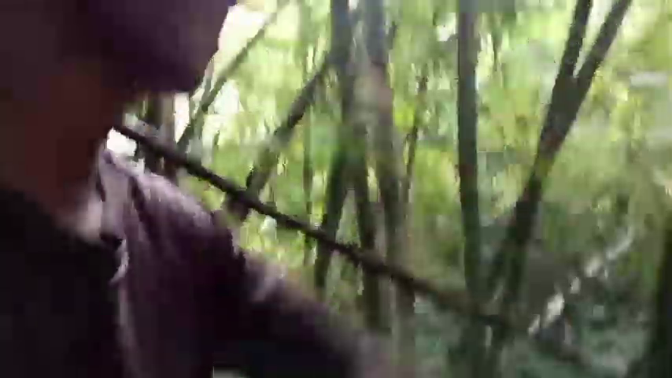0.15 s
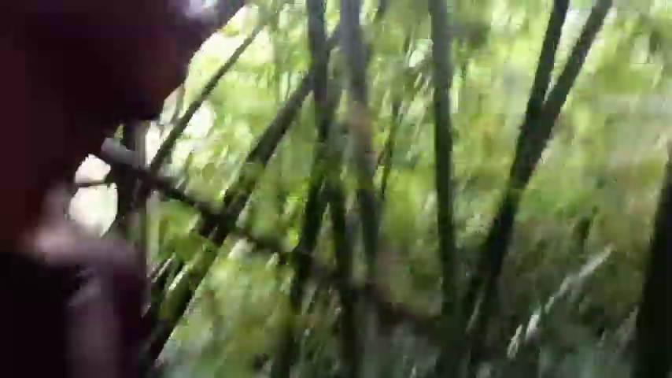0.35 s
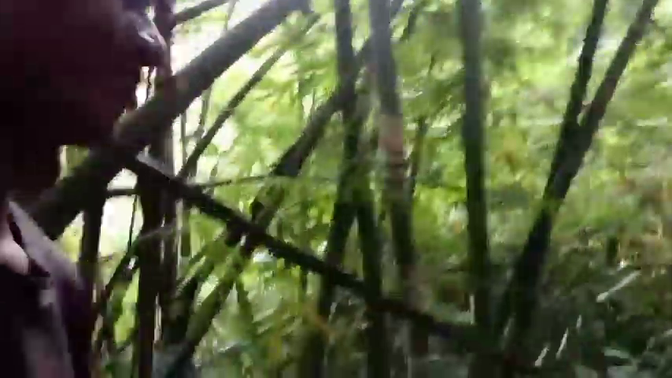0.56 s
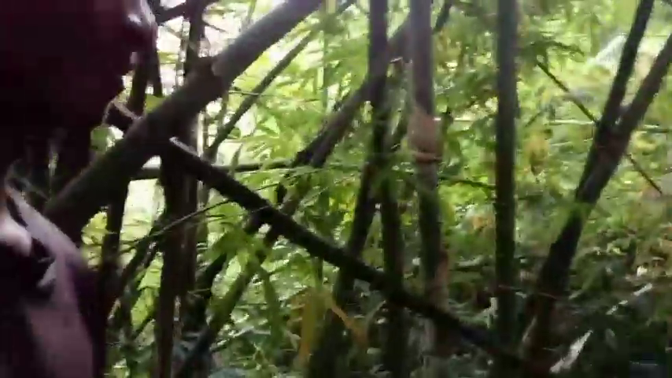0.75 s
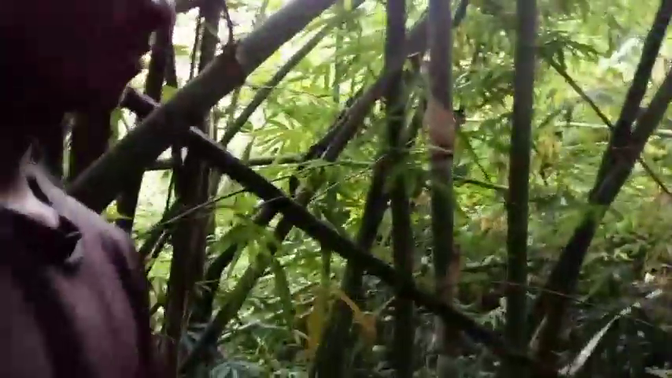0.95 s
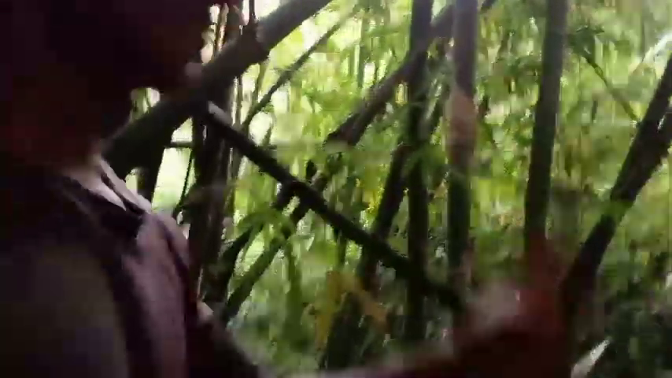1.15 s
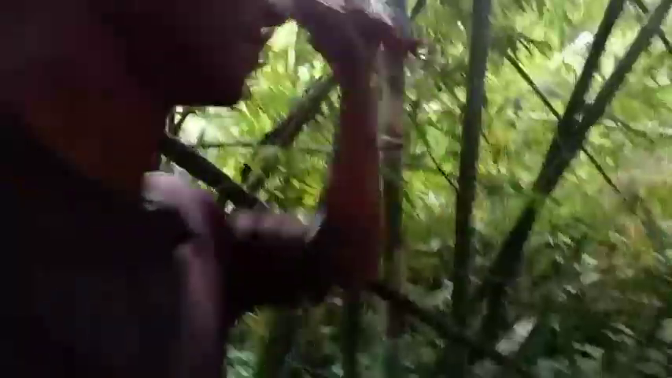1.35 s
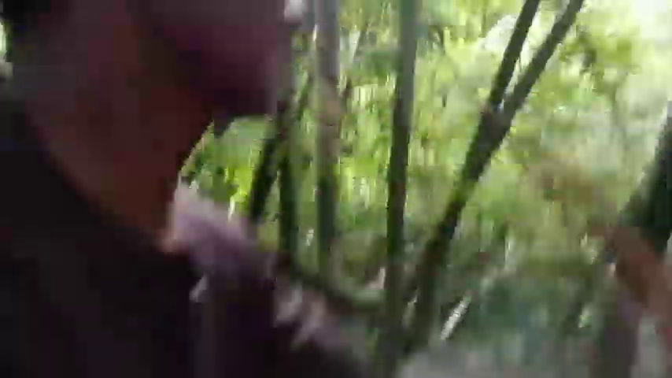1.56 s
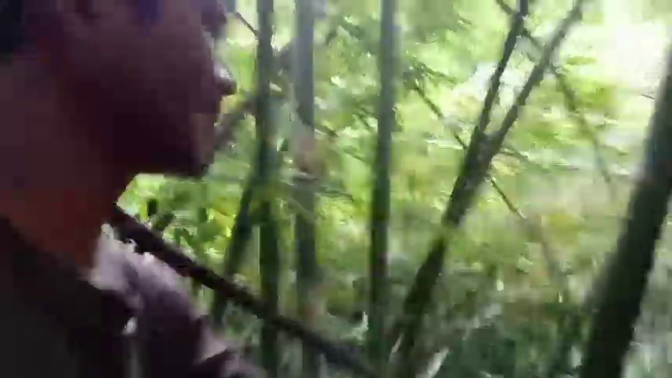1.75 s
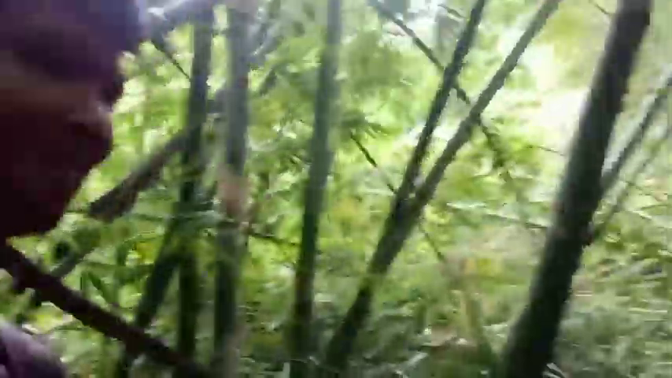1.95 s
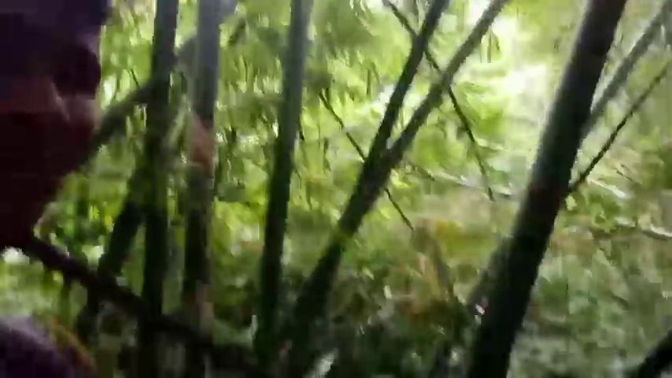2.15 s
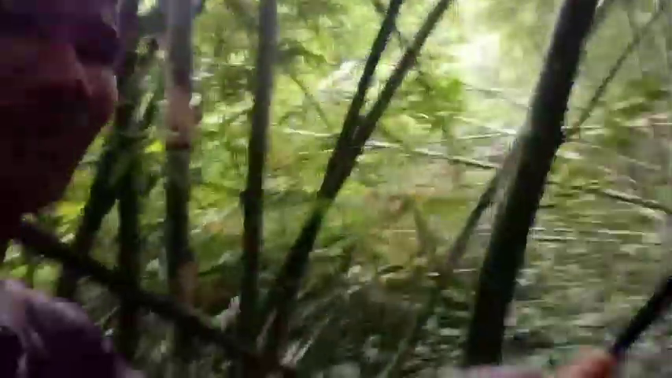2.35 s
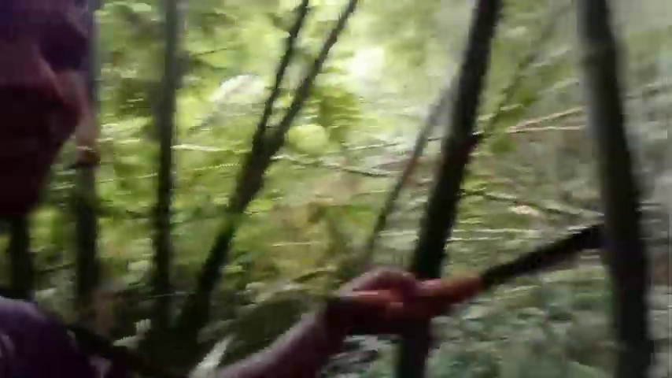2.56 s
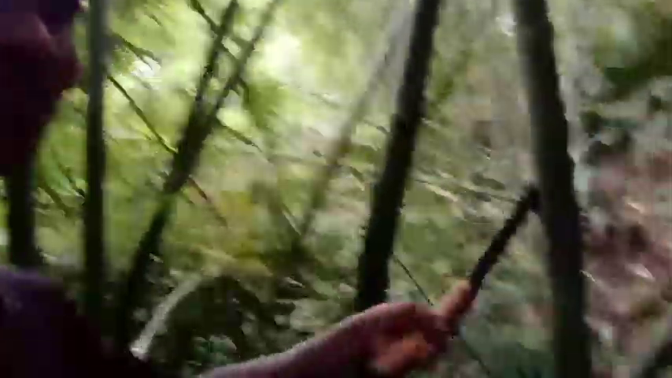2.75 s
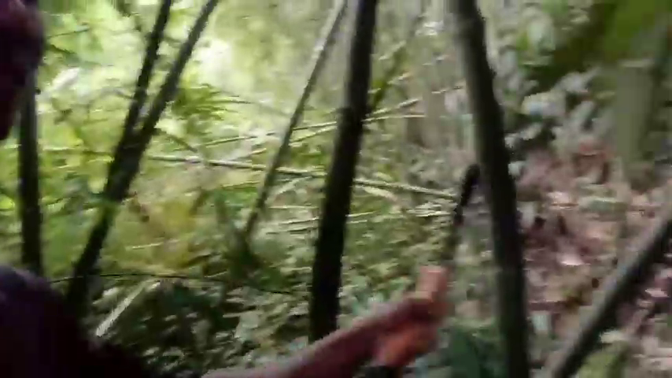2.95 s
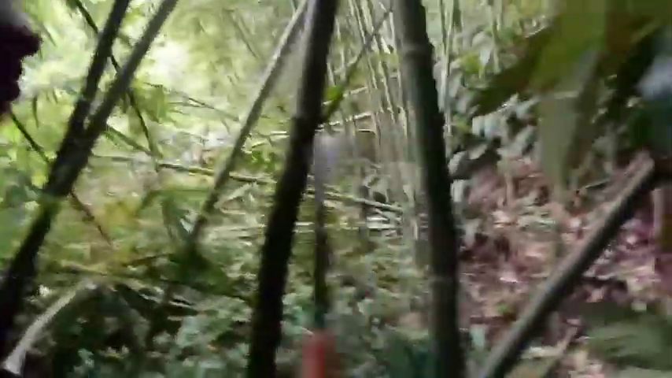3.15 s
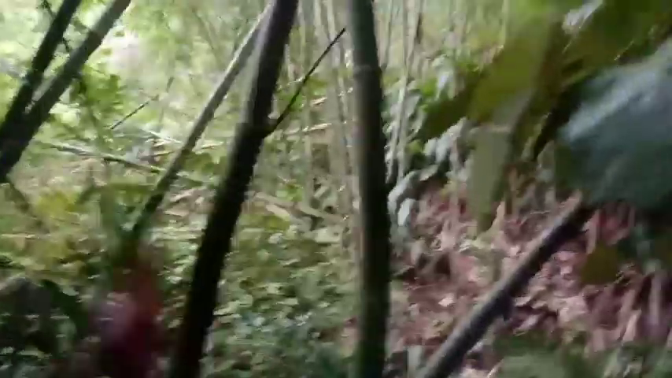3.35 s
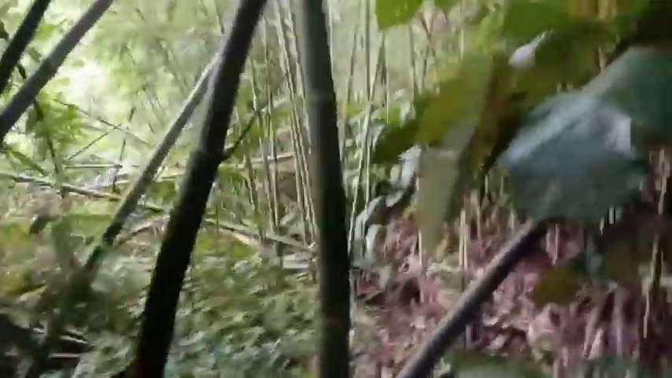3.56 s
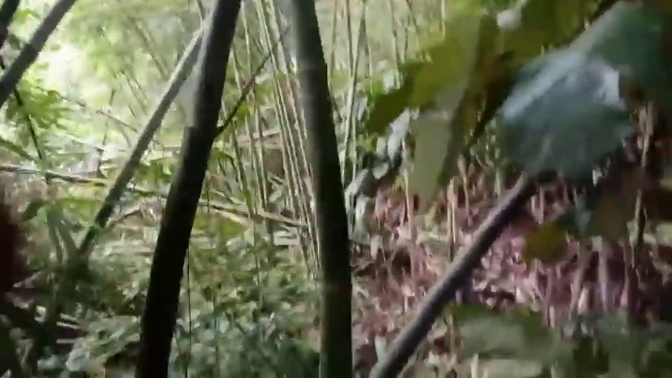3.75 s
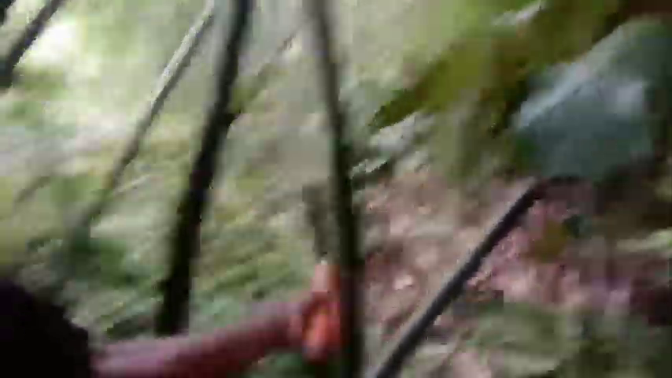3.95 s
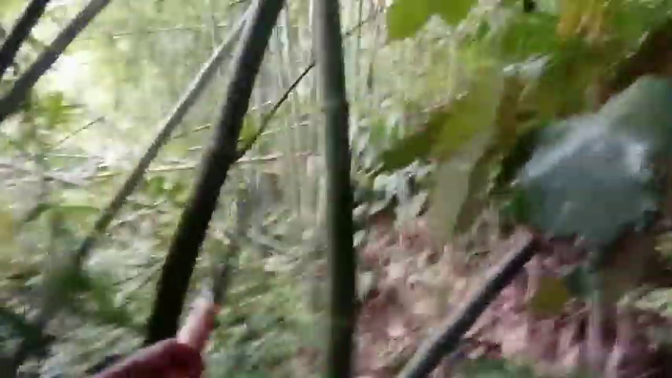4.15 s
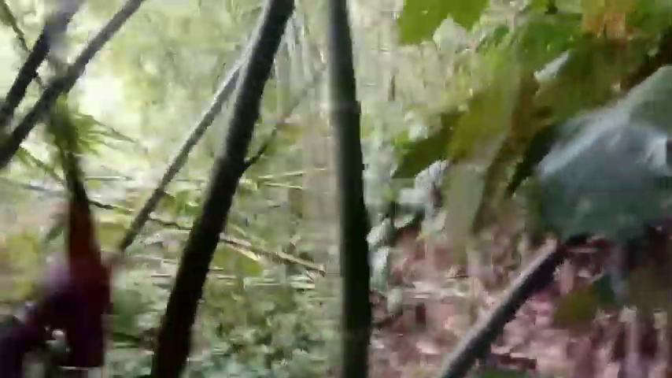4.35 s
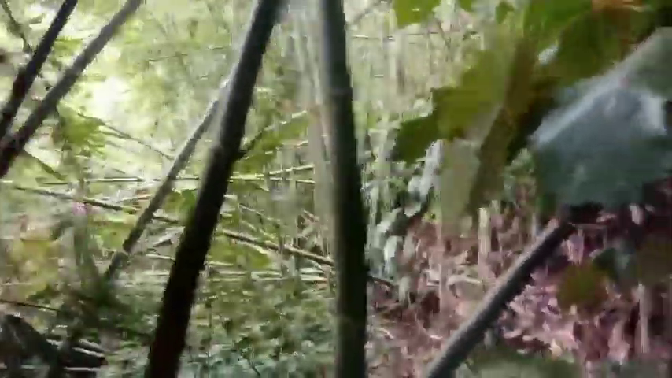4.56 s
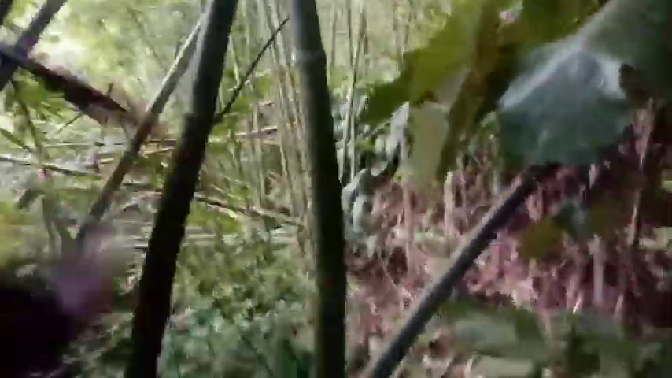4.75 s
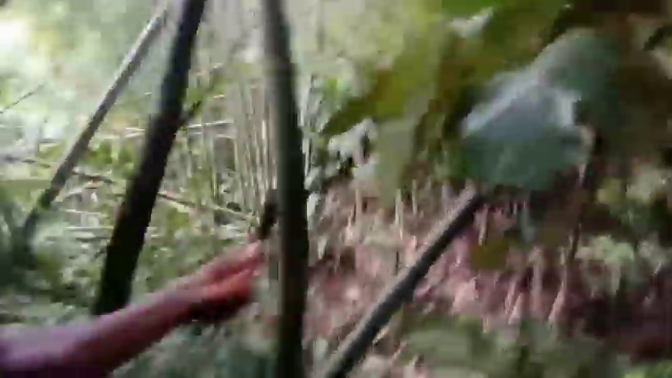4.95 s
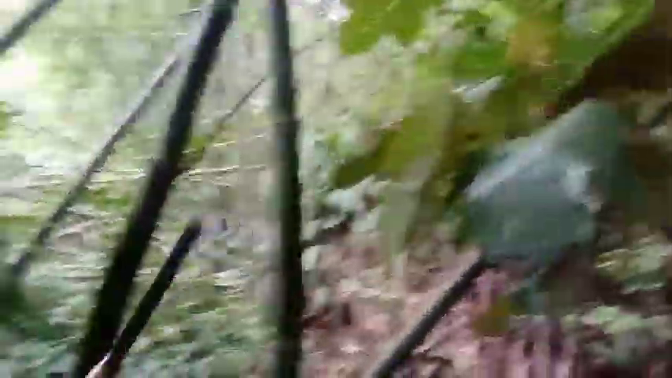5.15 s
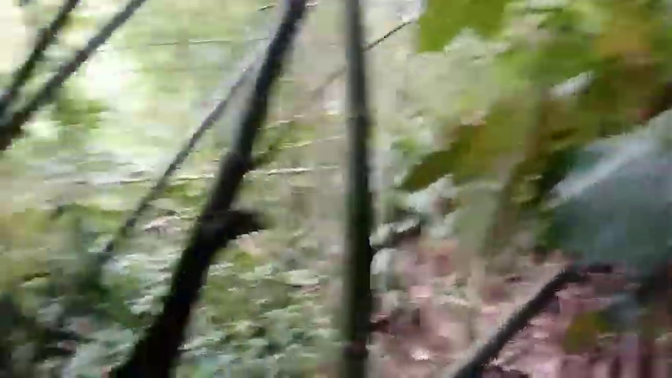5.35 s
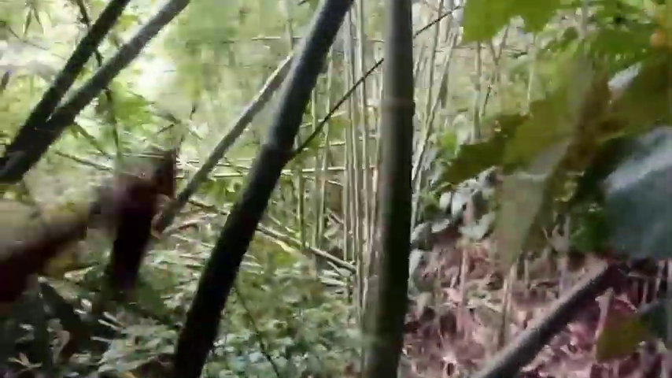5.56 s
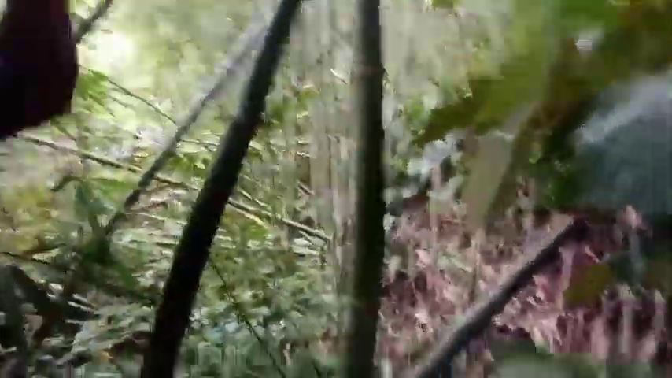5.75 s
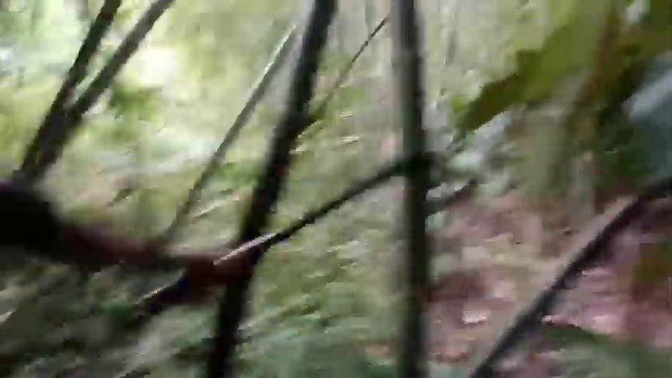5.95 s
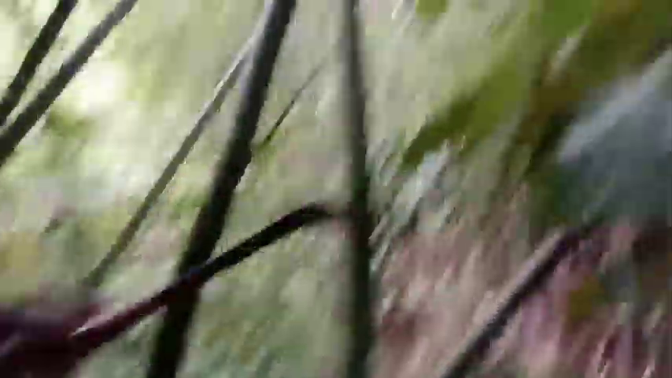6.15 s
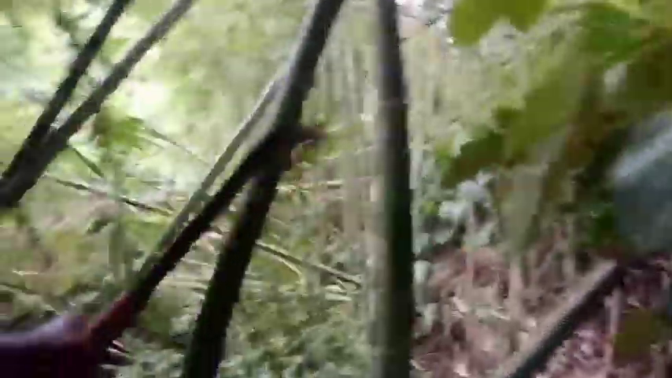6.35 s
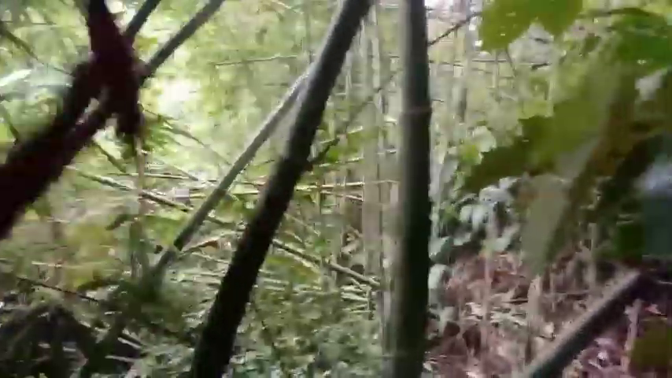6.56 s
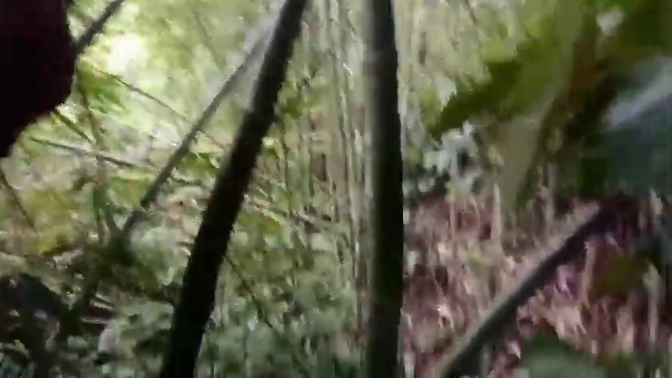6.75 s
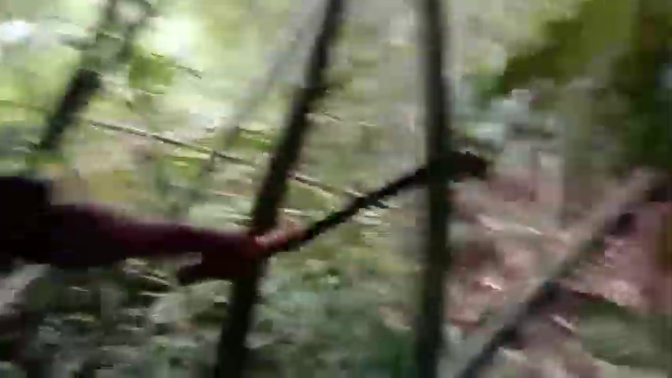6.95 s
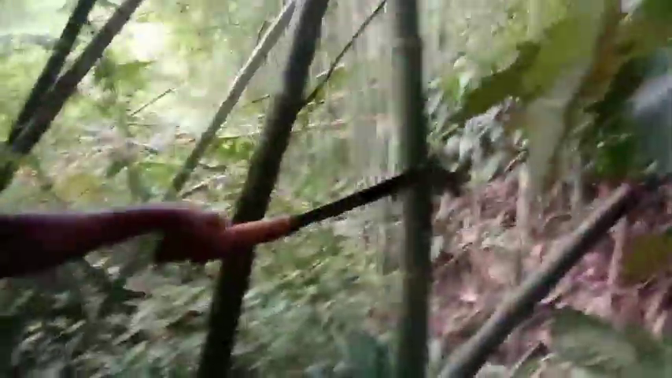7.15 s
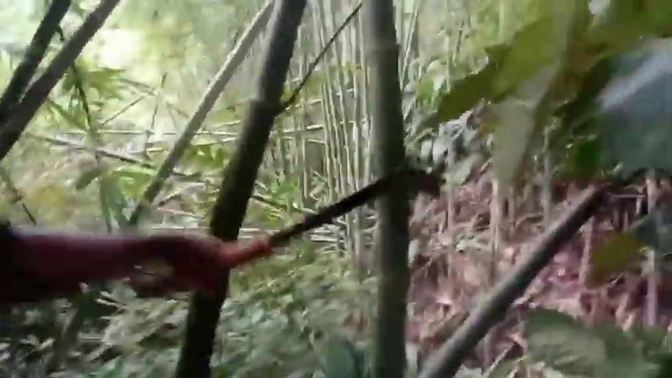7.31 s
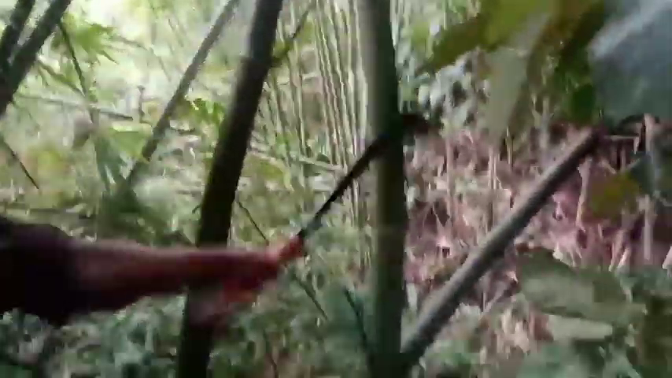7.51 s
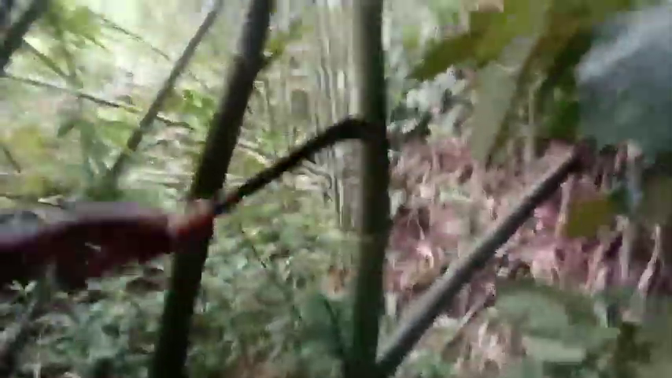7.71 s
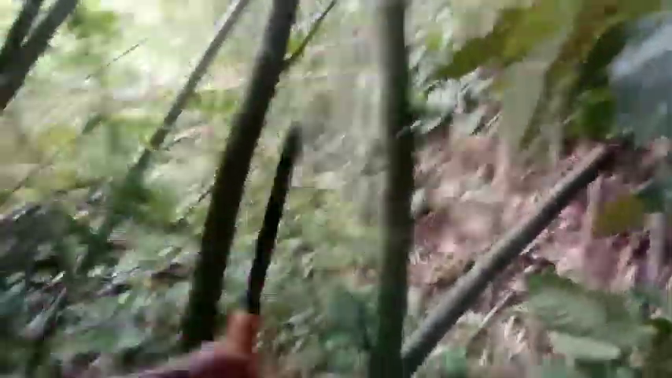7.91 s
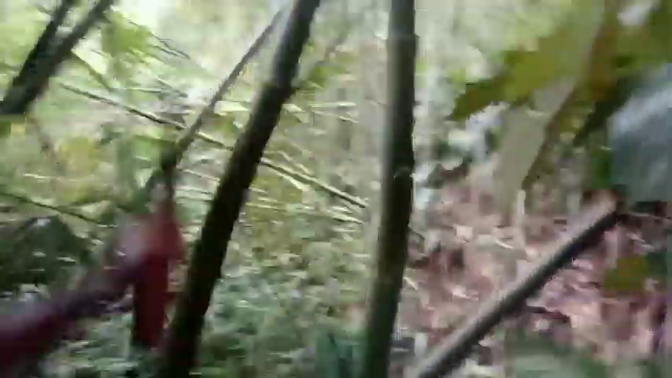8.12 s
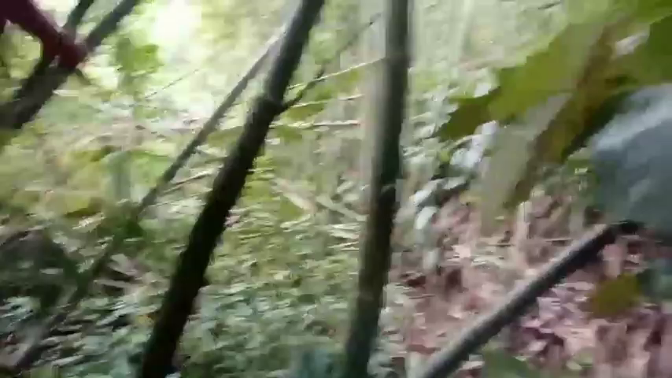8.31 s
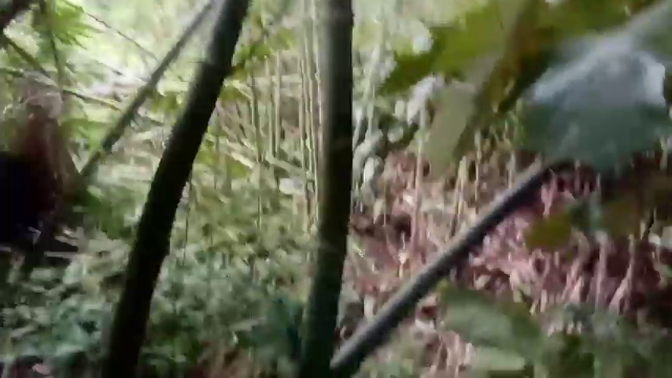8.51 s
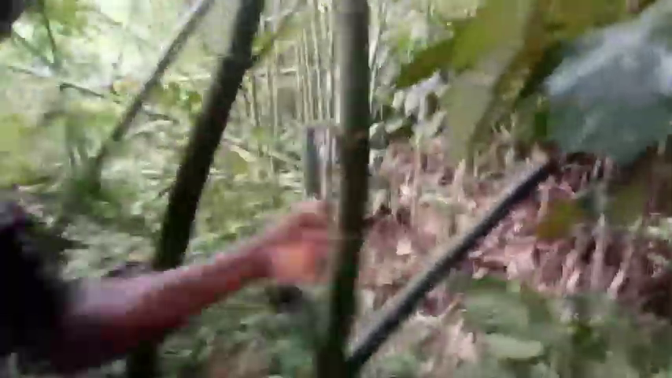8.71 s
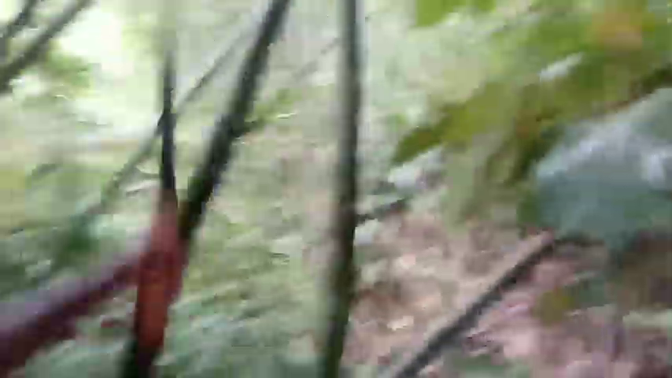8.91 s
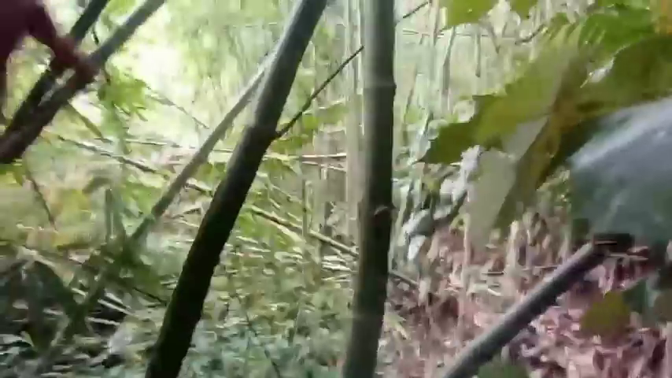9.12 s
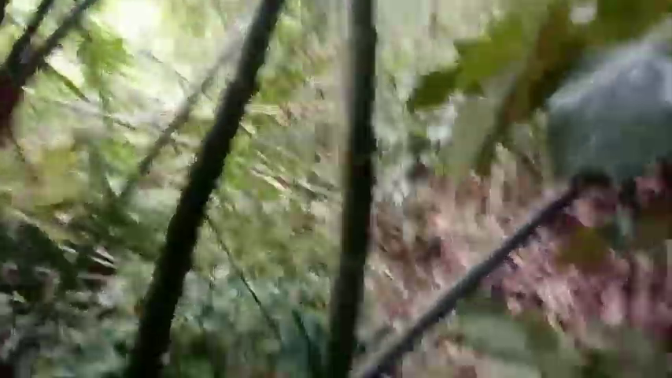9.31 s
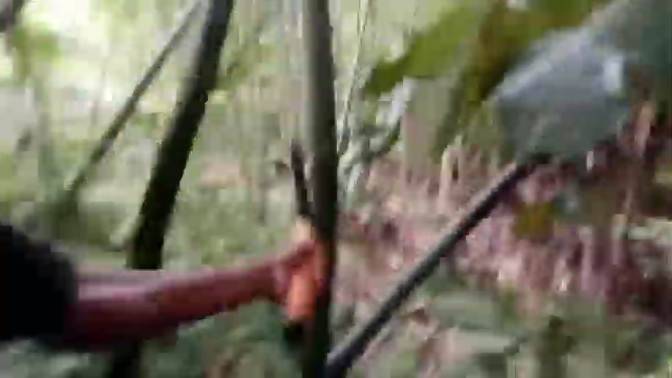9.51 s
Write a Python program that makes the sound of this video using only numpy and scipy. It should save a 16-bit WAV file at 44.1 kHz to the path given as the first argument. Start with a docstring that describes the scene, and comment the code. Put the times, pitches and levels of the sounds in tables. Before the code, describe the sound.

In a dense bamboo grove, a hooked blade strikes a green stalk close to a small microphone. The first cut cracks and splinters, followed by light leaf rustling and tiny twig snaps. Six more spaced chops land with woody cracks, hollow ringing and a short scattered echo. A distant bird repeats thin rising whistles over soft air and insect hiss; steel clinks faintly twice.

```python
"""Soft air in the foliage and a thin hiss of insects (filtered noise) run throughout a dense bamboo grove.
Close by, a long hooked blade chops a green culm: a bright skin crack, tearing crackle and ringing modes,
scattered back by decaying noise. The first cut splinters through; twigs snap in short resonant crackles, and
leaves rustle in clumps of clicks. From 1.4 s a distant bird repeats a rising whistle (gliding sines); at 3.7
and 8.5 s the steel clinks (decaying modes and a skid). The last chop falls at 8.7 s."""
import sys
import numpy as np
from scipy import signal
from scipy.fft import rfft, irfft, next_fast_len
from scipy.io import wavfile
from scipy.ndimage import map_coordinates

SR = 44100
rng = np.random.default_rng(int(sys.argv[2]) if len(sys.argv) > 2 else 0)


def wav_out(sig):
    """Save sig, one row per channel (or a flat mono array), as 16-bit PCM at SR to the path in sys.argv[1]."""
    wavfile.write(sys.argv[1], SR, np.round(np.clip(np.atleast_2d(sig).T, -1, 1) * 32767).astype(np.int16))


N = 422478
LIFE = np.arange(SR // 2) / SR  # time within one event, s


def amp(db):
    """Decibels to gain."""
    return 10 ** (np.asarray(db) / 20)


def unit(x):
    """Scale to rms 1."""
    return x / np.sqrt(np.mean(x ** 2) + 1e-20)


def unit_energy(x):
    """Scale to energy 1."""
    return x / (np.linalg.norm(x) + 1e-20)


def along(points, hz):
    """Interpolate (Hz, value) points on a log frequency axis."""
    f, v = np.transpose(points)
    return np.interp(np.log(hz + 1), np.log(f + 1), v)


def wobble(rate_hz):
    """Smooth random curve, rate_hz knots a second."""
    knots = rng.standard_normal(int(N * rate_hz / SR) + 4)
    return map_coordinates(knots, [np.arange(N) * rate_hz / SR])


def coloured(x, points):
    """Causal minimum-phase filter with the gain of the (Hz, dB) points, by folding the cepstrum."""
    half = next_fast_len(len(x) // 2 + 4096)
    gain = amp(along(points, np.fft.rfftfreq(2 * half, 1 / SR)))
    cepstrum = irfft(np.log(gain))
    cepstrum[1:half] *= 2
    cepstrum[half + 1:] = 0
    response = np.exp(rfft(cepstrum))
    return irfft(rfft(x, 2 * half) * response)[:len(x)]


def balanced(x, edges_hz, levels_db):
    """Tilt a burst so that each band nears the energy of 5 ms at its level."""
    hz = np.fft.rfftfreq(len(x), 1 / SR)
    power = 2 * abs(rfft(x)) ** 2 / len(x) / (.005 * SR)
    points = []
    for lo, hi, db in zip(edges_hz, edges_hz[1:], levels_db):
        present_db = 10 * np.log10(power[(hz > lo) & (hz < hi)].sum())
        points.append((np.sqrt(lo * hi), db - present_db))
    return coloured(x, points)


def octaves(edges_hz, pivot_hz):
    """How far the middle of each band lies above the pivot, in octaves."""
    return np.log2(np.sqrt(np.multiply(edges_hz[:-1], edges_hz[1:])) / pivot_hz)


def resonant(x, hz, sharpness):
    """Pass x through one resonance of Q = sharpness."""
    return signal.lfilter(*signal.iirpeak(hz, sharpness, fs=SR), x)


def crackle(size, spread_db):
    """Noise made of tiny clicks of unequal strength, rms 1."""
    strength = amp(spread_db * np.clip(rng.standard_normal(size), -2, 2))
    return unit(rng.standard_normal(size) * strength)


def add(track, s, x):
    """Mix x into the track at s seconds."""
    start = max(round(s * SR), 0)
    track[start:start + len(x)] += x[:max(N - start, 0)]


def grove(x, hold_s, stretch=1):
    """Countless stalks scatter the sound: near ones keep it up briefly, then each band fades at its own rate."""
    # decay before stretch: hz, t60_s
    grove_decay = [(100, 0.42), (500, .42), (1500, 0.54), (3500, 0.62), (6000, 0.51), (9000, 0.52),
                   (15000, 0.16)]
    hz, t, z = signal.stft(crackle(SR, spread_db=7.0), SR, nperseg=256)
    t60_s = stretch * along(grove_decay, hz)[:, None]
    fade = amp(-60 * np.maximum(t - hold_s, 0) / t60_s)
    onset = 1 - np.exp(-t / 0.0038)
    tail = signal.istft(z * fade * onset, SR, nperseg=256)[1]
    return signal.fftconvolve(x, unit_energy(tail))


def forest():
    """Soft air in the foliage and a narrow, steady band of insects, both filtered noise."""
    # air spectrum: hz, gain_db
    air_colour = [(15, -36), (25, -11.5), (91, -1.5), (433, -9), (614, -3.5), (782, -11), (1710, -10.5),
                  (2120, -12.5), (3000, -13.5), (4260, -25.5), (5730, -23), (7300, -41.5), (8580, -10),
                  (9810, -40.5), (15500, -32)]
    insect_colour = [(6500, -60), (7900, -22), (8300, -7), (8480, 0), (8700, -8), (9200, -22), (11000, -60)]
    air = unit(coloured(rng.standard_normal(N), air_colour)) * amp(-66.5 + 0.23 * wobble(6.0))
    insects = unit(coloured(rng.standard_normal(N), insect_colour)) * amp(-78.0 + .8 * wobble(9.1))
    return air + insects


def ring_culm():
    """The hollow culm rings in decaying modes, slightly detuned and rebalanced per blow; energy 1."""
    # modes, nominal: pitch_hz, level_db, t60_s
    culm_modes = [(116, -14.5, 0.13), (188, -8.5, 0.11), (493, -2.5, 0.066), (600, -6.5, 0.063),
                  (797, -4.5, 0.26), (1216.4, -5.5, 0.086), (1303, -6.5, 0.09), (1585, 0.5, 0.035),
                  (1970, -3, 0.11), (2174, -2.5, 0.1), (2337, -8, 0.13), (2650, 0.5, 0.084),
                  (3010, 2.5, 0.042), (3130, 0.5, 0.049), (3810, 0.5, 0.096)]
    ring = np.zeros(len(LIFE))
    for hz, level_db, t60_s in culm_modes:
        envelope = amp(level_db + rng.normal(0, 2.9) - 60 * LIFE / t60_s)
        tone = np.sin(2 * np.pi * hz * rng.normal(1, 0.0087) * LIFE)
        ring += envelope * tone * rng.choice([-1, 1])
    return unit_energy(ring)


def chops():
    """The edge cracks the skin, tears fibres as it sinks in, and sets the hollow culm ringing."""
    # bites, often with a deeper wedging a moment later:
    # start_s, level_db, heft_db, brightness_db_per_octave, wall_pitch_hz, bite_t60_s, echo_db
    bites = [(0.2711, -3.5, 2, 2.5, 3020, 0.2, -12), (0.2865, -6, 3.5, -1, 1130, 0.061, -9.5),
             (0.2948, -7.5, 7, 5.5, 2750, 0.063, -11.5), (1.728, 1.5, -3.5, -0.5, 1290, 0.064, -10.5),
             (1.7357, -4.5, -6.5, -3, 3060, 0.086, -7.5), (4.0004, -1, -1, -0.5, 1560, 0.19, -9.5),
             (4.9628, 0.5, 1, 0, 1200, 0.11, -8), (6.0796, -0.5, 0.5, 0.13, 2040, 0.08, -9),
             (6.0916, -3.5, -0.5, -1.5, 2150, 0.14, -10), (7.022, -1.5, -2, -0.63, 3000, 0.063, -6),
             (7.0279, -3, -2, -0.2, 2700, 0.063, -5), (8.7354, 2, 0, 0.12, 1460, 0.14, -13.5)]
    # edges of the boom, thud, knock, crack and fizz bands: hz
    band_edges = [40, 250, 900, 2200, 5500, 16000]
    # balance shared by all chops, one per band: level_db
    band_levels = [-28.5, -16.5, -11.5, -11, -22.5]
    # share of heft in each band (boom and thud only): weight
    heft_weights = [1, 1, 0, 0, 0]
    # torn fibre spectrum: hz, gain_db
    fibre_colour = [(25, -17.5), (60, -5.5), (120, 3.5), (200, -3.5), (300, -4), (520, -6), (900, -3),
                    (1300, 0), (3100, -2), (4200, -5.5), (5500, -14), (7200, -15), (8800, -6),
                    (10500, -19.5), (15500, -26)]
    # hard skin spectrum: hz, gain_db
    skin_colour = [(300, -18), (2500, -2), (4500, -4), (7000, -7.5), (9000, -3), (12000, -20),
                   (15500, -19.5)]
    track = np.zeros(N)
    for s, db, heft_db, brightness, wall_hz, bite_t60_s, echo_db in bites:
        levels_db = db + np.array(band_levels) + heft_db * np.array(heft_weights)
        levels_db = levels_db + brightness * octaves(band_edges, pivot_hz=1500)

        def voiced(x, ring):
            """The cut strip of wall has its own pitch, which changes from blow to blow."""
            return balanced(x + ring * resonant(x, wall_hz, sharpness=8), band_edges, levels_db)

        skin = coloured(rng.standard_normal(len(LIFE)) * amp(-60 * LIFE / 0.01), skin_colour)
        decay = amp(-60 * LIFE / bite_t60_s) + amp(-60 * LIFE / 0.0079)
        force = decay * (1 - np.exp(-LIFE / .0006))
        tear = coloured(crackle(len(LIFE), spread_db=2) * force, fibre_colour)
        culm = ring_culm()
        blow = unit_energy(tear) + amp(-6) * unit_energy(skin) + amp(-6.5) * culm
        add(track, s, voiced(blow, ring=0.89))
        # the sharp front of the blow is what comes back, almost unchanged in colour
        impact = unit_energy(coloured(signal.unit_impulse(len(LIFE)), fibre_colour))
        front = voiced(impact + amp(-12.0) * culm, ring=0.85)
        returned = coloured(front, [(100, 0.53), (4000, 0.0), (8800, 0.0), (12000, 0.36), (15500, 2)])
        add(track, s, amp(echo_db) * grove(returned, hold_s=0.058))
    return track


def snaps():
    """Wood breaks with a tick, short splintering and a dry note: thick thuds, high, clean breaks are brighter."""
    # twigs and stalks: start_s, level_db, pitch_hz, thickness (0 twig - 1 stalk),
    # sharpness (0 bending - 1 clean break)
    breaks = [(0.313, -21, 3000, 0.89, 0), (0.3471, -12.5, 2900, 0.06, 0.46),
              (0.3871, -27.5, 2960, 0.83, .4), (0.4208, -28.5, 3050, 1, 0.41),
              (0.4449, -24.5, 2370, 0.67, 0.47), (0.482, -29, 2230, 0.74, 0.62),
              (0.6545, -43, 2470, .8, .05), (0.7984, -48.5, 2600, 0.88, 0.69),
              (0.9014, -44.5, 1870, 0.83, .25), (1.0053, -41, 1810, 0.83, 0.26),
              (1.1613, -35.5, 3570, 0.78, 0.86), (1.459, -39, 2520, .4, .3), (2.0086, -40, 4070, .5, 0.55),
              (2.204, -39, 4910, .05, 0.69), (2.2321, -38.5, 4200, 0, 0.14),
              (2.4178, -41, 4800, 0.37, 0.55), (2.539, -48.5, 3240, 0, 0.2), (2.587, -39, 3130, 0, .1),
              (2.604, -38.5, 4030, 0, .05), (2.6502, -34, 2780, 0, 0.17), (2.666, -38, 3760, 0.013, .25),
              (2.763, -40.5, 4300, 0.53, .25), (2.9204, -40.5, 2300, 0.73, 0),
              (3.077, -43.5, 1920, 0.38, 0.35), (3.2936, -41.5, 1345, 0.22, 0.026),
              (5.2133, -38.5, 2320, 0.78, 0), (5.837, -55, 800, 0.96, 0), (6.2206, -22.5, 3000, 0.12, 0.53),
              (7.5368, -45, 3000, 0.74, .25), (7.6142, -32, 4360, 1, 0.73), (7.635, -19, 2860, 0.072, 0),
              (7.918, -48, 1800, .35, .05)]
    # edges of the thud, knock, crack and fizz bands: hz
    band_edges = [150, 900, 2200, 5500, 16000]
    # balance of the thinnest twig, one per band: level_db
    thin_levels = [-28, -14.5, 1, -17]
    # balance of the thickest stalk, one per band: level_db
    thick_levels = [-2.5, -1.5, -4.5, -16.5]
    # splintering spectrum: hz, gain_db
    twig_colour = [(80, -10.5), (250, 5.5), (900, 2.5), (2200, -2), (3600, -2), (5500, -11.5), (7000, -15),
                   (8700, -2), (11000, -20.5), (15500, -18.5)]
    # clean break spectrum: hz, gain_db
    tick_colour = [(500, -20.5), (3000, -0.5), (5000, 0), (7000, -11), (9000, 5), (12000, -9.5),
                   (15500, -11.5)]
    thin_t60_s, thick_t60_s = 0.04, 0.084  # thicker wood splinters for longer
    pivot_hz, db_per_octave_squared = 2840, 3.3  # tilt in dB per octave, for each octave of pitch
    tick_db = 24.5  # over the snap's level, at full sharpness
    track = np.zeros(N)
    tick = unit_energy(coloured(signal.unit_impulse(len(LIFE)), tick_colour))
    for s, db, hz, thickness, sharpness in breaks:
        thickness = np.clip(thickness, 0, 1)
        t60_s = thin_t60_s + thickness * (thick_t60_s - thin_t60_s)
        colour_db = thin_levels + thickness * np.subtract(thick_levels, thin_levels)
        brightness = db_per_octave_squared * np.log2(hz / pivot_hz) + 2.2 * sharpness
        force = amp(-60 * LIFE / t60_s) + 0.5 * amp(-60 * LIFE / 0.0046)
        splinter = coloured(crackle(len(LIFE), spread_db=9) * force, twig_colour)
        note = unit_energy(resonant(splinter, hz, sharpness=3.7))
        levels_db = db + colour_db + brightness * octaves(band_edges, hz)
        snap = balanced(unit_energy(splinter) + 0.42 * note, band_edges, levels_db)
        snap = snap + sharpness ** 2 * amp(db + tick_db) * tick
        add(track, s, snap)
        add(track, s, amp(-13.5) * grove(snap, hold_s=.014, stretch=0.32))
    return track


def ticks(rate_hz, spread_db):
    """Dry leaf edges and stems flick each other: brief clicks of scattered pitch and size, rms 1."""
    track, t = np.zeros(N), LIFE[:SR // 100]
    for when, pitch, size in rng.random((int(rate_hz * N / SR), 3)):
        cycles = 1500 * 6 ** pitch * t  # 1500-9000 Hz
        ring = np.sin(2 * np.pi * cycles) * np.exp(-cycles / 1.3)
        add(track, when * N / SR, amp(spread_db * size ** 3 - 6 * pitch) * ring)
    return unit(track)


def rustle():
    """Leaves drag over each other in uneven clumps of small crackles; each brush swells, holds and settles."""
    # brushes, start_s being the end of the swell: start_s, hold_s, level_db, crispness_db
    brushes = [(0.507, 0.45, -53, -8.5), (1.084, 0.15, -56.5, -8.5), (1.446, 0.11, -61.5, -5.5),
               (2.169, 0.16, -56.5, -10.5), (2.546, 0.28, -62.5, -4.5), (2.885, 0.37, -62.5, -8),
               (3.168, 0.067, -50, -7), (7.734, 0.14, -57, -4)]
    # leaf spectrum: hz, gain_db
    leaf_colour = [(35, -42), (60, -11.5), (215, -5.5), (403, -2), (475, -5), (1170, -3), (1550, -5.5),
                   (1960, -2), (3930, -3), (6410, -22), (8870, -7.5), (10400, -21.5), (15500, -25.5)]
    rise_s, settle_t60_s = 0.046, 0.29
    track, now = np.zeros(N), np.arange(N) / SR
    clumps = amp(2.4 * wobble(42) + 1.6 * wobble(210))
    drag = unit(coloured(crackle(N, spread_db=8) * clumps, leaf_colour))
    leaves = drag + .65 * ticks(rate_hz=180, spread_db=21)
    body = unit(signal.sosfilt(signal.butter(2, 4200, fs=SR, output="sos"), leaves))
    crisp = unit(signal.sosfilt(signal.butter(3, 5500, "high", fs=SR, output="sos"), leaves))
    for s, hold_s, db, crisp_db in brushes:
        swell = np.clip(1 + (now - s) / rise_s, 0, 1)
        settle = amp(-60 * np.maximum(now - s - hold_s, 0) / settle_t60_s)
        track += amp(db) * swell * settle * (body + amp(crisp_db) * crisp)
    return track


def bird():
    """Each whistle slides up to its top note and at once drops away, blurred by the far side of the grove."""
    LOW, HIGH = (4420, -56.5), (5280, -61)  # notes: nominal top_hz, level_db
    # whistles: start_s, note (top_hz, level_db)
    whistles = [(1.408, LOW), (1.659, LOW), (2.319, HIGH), (2.829, LOW), (3.461, HIGH), (3.74, LOW),
                (4.578, HIGH), (4.86, LOW), (5.43, HIGH), (5.771, HIGH), (6.04, LOW), (6.578, HIGH),
                (6.941, HIGH), (7.471, LOW), (7.739, HIGH), (8.109, HIGH), (8.369, LOW), (8.638, LOW),
                (9.322, HIGH)]
    track = np.zeros(N)
    for s, (top_hz, db) in whistles:
        t = LIFE * rng.normal(1, 0.095)  # no two calls have quite the same pace
        quaver = 1 + 0.02 * np.sin(2 * np.pi * (70 * t + rng.random()))
        glide_hz = [3150, 3700, top_hz * .92, top_hz, top_hz * .85]
        pitch_hz = quaver * np.interp(t, [0, .02, .045, .075, .115], glide_hz)
        effort = amp(np.interp(t, [0, .015, .04, .065, .09, .125], [-12, 0, -2, -2, -6, -70]))
        absorption = (3500 / pitch_hz) ** 0.79  # foliage soaks up the higher notes
        whistle = effort * absorption * np.sin(2 * np.pi * np.cumsum(pitch_hz) / SR)
        add(track, s, amp(db - 5) * whistle)
        add(track, s, amp(db + 0.5) * grove(whistle, hold_s=0.018, stretch=1.3))
    return track


def ring_blade(place):
    """The steel rings in decaying modes whose levels depend on the place of contact."""
    # modes: pitch_hz, t60_s, heel_level_db, tip_level_db
    blade_modes = [(719, .1, -6, 3), (807, .4, -7, -40), (1297, .36, -30, -8), (1548, .15, -11, -3),
                   (1965, .24, -6, -6), (2159, .18, -2, -25), (2546, .07, -14, 2), (2960, .25, -18, -15),
                   (3420, .2, -16, -11), (4700, .18, -30, -17), (7052, .21, -35, -17),
                   (9515, .24, -15, -15), (11080, .18, -30, -17), (13070, .14, -16, -26)]
    ring = np.zeros(len(LIFE))
    for hz, t60_s, heel_db, tip_db in blade_modes:
        level_db = np.interp(place, [0, 1], [heel_db, tip_db])
        tone = np.sin(2 * np.pi * (hz * LIFE + rng.random()))
        ring += amp(level_db - 60 * LIFE / t60_s) * tone
    return ring


def clinks():
    """The steel skids briefly over a stalk and rings."""
    # glancing contacts: start_s, level_db, place (0 heel - 1 tip)
    glances = [(3.7003, -37.5, 0.071), (8.502, -37, 0.98)]
    skid_colour = [(100, -14.5), (700, -1.0), (3000, 3.5), (5500, -12.0), (9000, -18.5), (15000, -29.5)]
    track = np.zeros(N)
    for s, db, place in glances:
        ring = ring_blade(place)
        skid = coloured(crackle(len(LIFE), spread_db=3.5) * amp(-60 * LIFE / 0.14), skid_colour)
        clink = amp(db) * (amp(6) * ring + amp(12.5) * skid)
        add(track, s, clink)
        add(track, s, amp(-18.5) * grove(clink, hold_s=.02))
    return track


def scene():
    """All sources at one microphone."""
    return (forest() + chops() + snaps() + rustle() + bird() + clinks())[None]


def record(dry):
    """The small microphone loses deep bass, the hardest peaks round off below 0.95, and the band ends steeply."""
    thin = signal.sosfilt(signal.butter(2, 42, "high", fs=SR, output="sos"), dry)
    held = thin / (1 + abs(thin / .95) ** 6) ** (1 / 6)
    return signal.sosfilt(signal.cheby1(10, .3, 15600, fs=SR, output="sos"), held)


dry = scene()
out = record(dry)
wav_out(out)
```